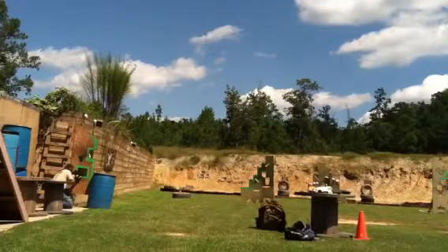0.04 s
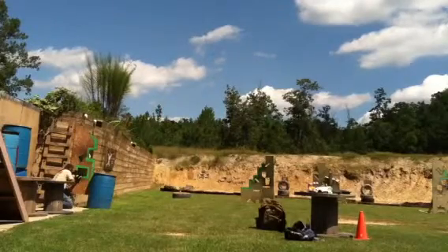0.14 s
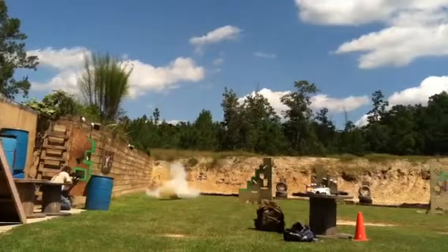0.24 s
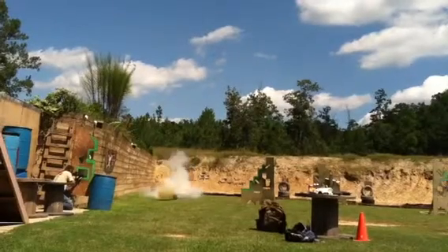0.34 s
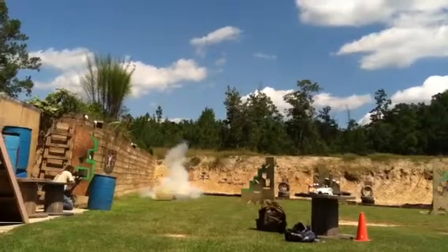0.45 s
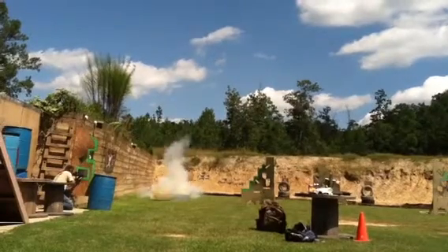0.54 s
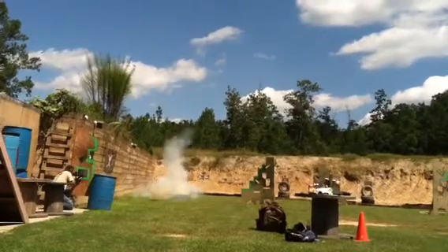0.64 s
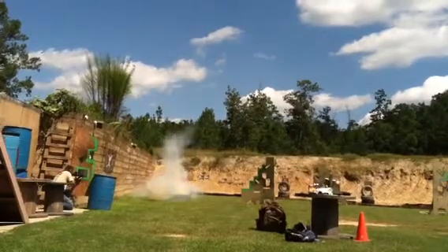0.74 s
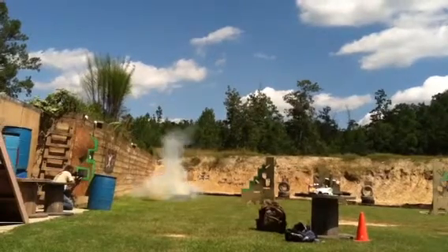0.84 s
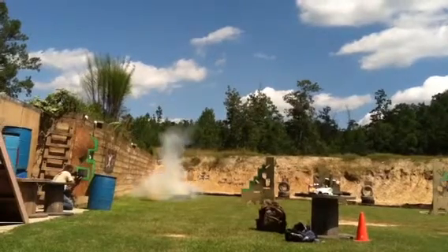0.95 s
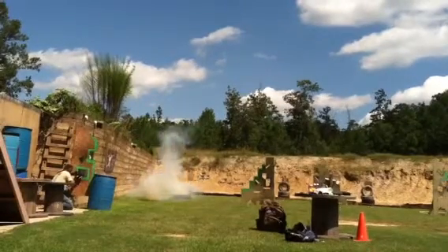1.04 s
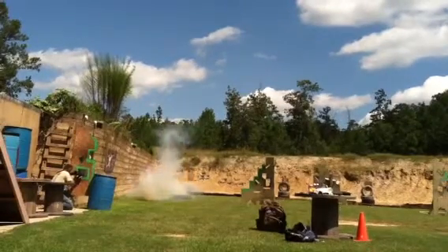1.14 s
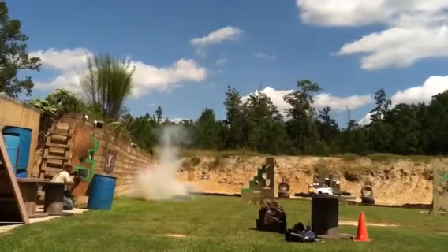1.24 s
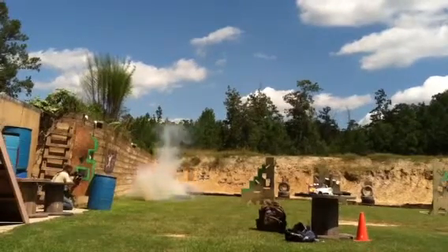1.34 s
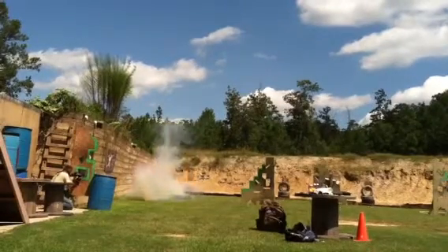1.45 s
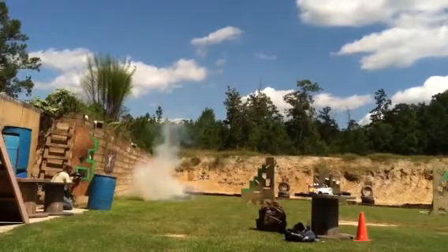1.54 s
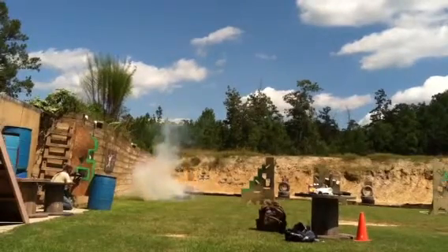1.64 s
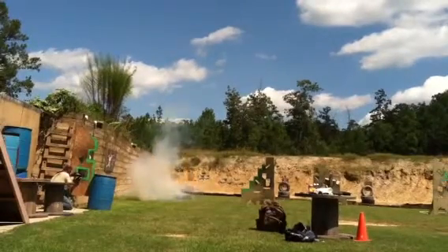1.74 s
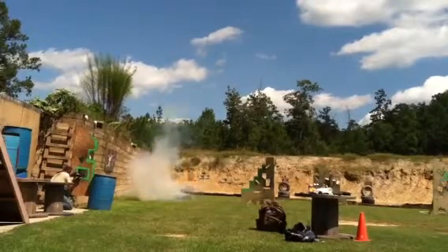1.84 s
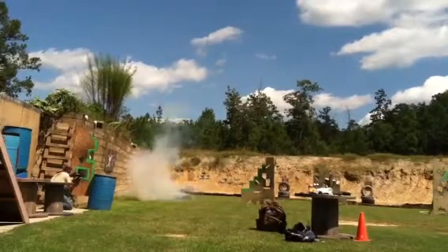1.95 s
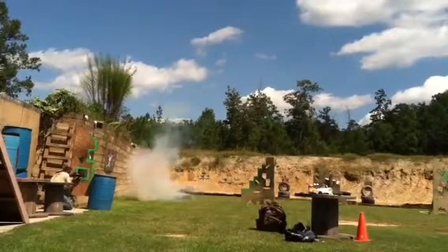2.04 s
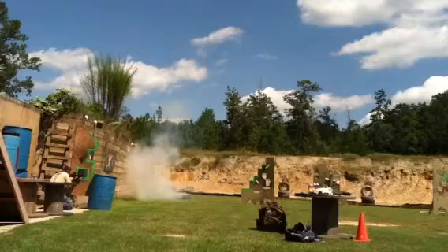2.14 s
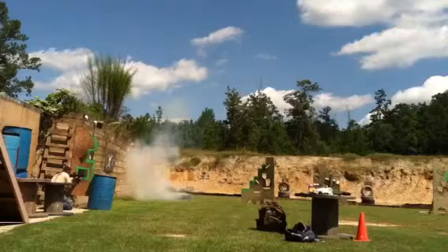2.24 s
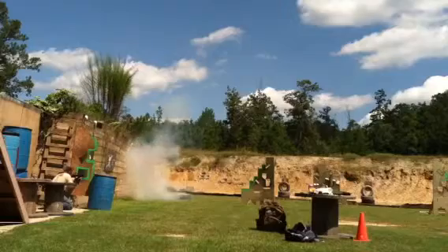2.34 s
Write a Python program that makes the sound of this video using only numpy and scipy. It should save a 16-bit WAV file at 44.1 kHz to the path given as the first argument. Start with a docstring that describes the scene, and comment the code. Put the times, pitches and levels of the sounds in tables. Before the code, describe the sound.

A loud explosive blast goes off an instant after the sharp rifle crack that triggers it. The boom rolls between earth banks and trees at an outdoor range, growing duller as it fades, and briefly overloads the small microphone.

```python
"""Rifle shot and small charge at an outdoor range

A shot sets off a charge: the crack comes first, then the blast, whose boom rolls between earth banks
and a tree line while the air absorbs the treble of its echoes. Faint ticks, a scuff, a rustle, hum
and hiss lie behind. The small microphone overloads."""
import sys
import numpy as np
from scipy import signal
from scipy.fft import rfft, irfft, next_fast_len
from scipy.io import wavfile
from scipy.ndimage import uniform_filter1d, map_coordinates

SR = 44100
rng = np.random.default_rng(int(sys.argv[2]) if len(sys.argv) > 2 else 0)


def transcribe(u):
    """Save the signal u as a 16-bit wav file named by the first command-line argument.

    u: samples, shape (n,) or (channels, n), limited to [-1, 1]; the rate is SR.
    q: integer samples, one column per channel.
    """
    v = np.clip(np.atleast_2d(u).T, -1, 1)
    q = np.round(v * 32767).astype(np.int16)
    wavfile.write(sys.argv[1], SR, q)


N = 105840
TIME = np.arange(N) / SR


def shock_fronts():
    """Shock waves: ragged cracks, and the blast's pressure step, which decays through zero into suction."""
    # Each row: start in seconds, level in dB, hold in seconds, 60 dB decay time in seconds.
    cracks = [(.219, -24, 0.0016, 0.0044), (.223, -2.5, 0.0032, .075), (0.2639, 2, 0.0032, .014)]
    # Each row: frequency in Hz, relative level in dB.
    colour = [(60, -5.5), (766, 2), (1440, -6), (3660, -8.5), (7000, -16.5), (10200, -23), (14500, -39.5),
              (16000, -50.5)]
    blast_s, overpressure_s = .2591, .0007
    age = np.clip(TIME - blast_s, 0, None) / overpressure_s
    blast = amp(3) * (age > 0) * (1 - age + .35 * noise(colour)) * np.exp(-age / 2)
    return blast + sum(amp(db) * burst(s, hold, t60) * noise(colour) for s, db, hold, t60 in cracks)


def boom():
    """Repeated reflection between the banks: low peals of unsteady pitch over a dark roll."""
    # Each row: start in seconds, length in seconds, level in dB, pitch in Hz.
    peals = [(0.267, 0.025, -3, 253), (0.292, 0.035, -11, 235), (0.319, .04, -4, 258),
             (0.358, 0.017, -16.5, 238.9), (0.373, 0.02, -8, 262.3), (0.396, 0.008, -8, 231),
             (0.42, 0.03, -13, 264.2), (0.47, 0.019, -10, 232.6), (0.501, 0.0435, -14, 284.5),
             (0.538, 0.013, -14, 230), (0.33, 0.052, -10, 150), (0.474, 0.073, -16.5, 145)]
    # Each row: time in seconds, level in dB.
    roll_levels = [(.262, -10), (.33, -7.5), (.4, -15), (.45, -21), (.52, -21), (.6, -22), (.7, -30.5),
                   (.9, -35), (1.25, -42.5), (1.75, -43), (1.9, -47.5), (2.4, -48)]
    # Each row: frequency in Hz, relative level in dB.
    roll_colour = [(60, -24), (100, -16.5), (145, -3), (250, 2.5), (320, -1.5), (400, -6), (520, -4.5),
                   (800, -21), (2000, -59)]
    wander, edge_s, low_cut_hz = .12, .0043, 125
    tones = 0
    for start, length, db, hz in peals:
        phase = 2 * np.pi * np.cumsum(hz * (1 + wander * wobble(100))) / SR
        swing = np.cos(phase) + amp(-12) * wobble(60) * np.cos(2 * phase)
        gate = np.clip(np.minimum(TIME - start, start + length - TIME) / edge_s + .5, 0, 1)
        tones += np.sqrt(2) * amp(db) * gate * swing
    tones = filtered(tones, lambda hz: 1 / (1 + (low_cut_hz / (hz + 1)) ** 6))
    return tones + envelope(roll_levels) * noise(roll_colour) * (TIME > roll_levels[0][0])


def diffuse_echo():
    """Scattering and air absorption: patchy returns, the duller the farther they have travelled."""
    # Each row: time in seconds, level in dB before absorption.
    levels = [(.262, -15), (.29, -19.5), (.37, -18), (.42, -23.5), (.47, -23.5), (.57, -23), (.62, -25.5),
              (.75, -28), (.9, -33.5), (1.1, -37.5), (1.3, -42), (1.8, -47.5), (2.4, -54)]
    # Each row: frequency in Hz, relative level in dB.
    colour = [(150, -22), (400, -4.5), (700, -2.5), (1100, 0), (2000, -3.5), (5000, -10.5), (8000, -19.5),
              (11000, -28), (14000, -53), (16000, -54.5)]
    # Each row: frequency in Hz, extra loss in dB per second of travel.
    absorption = [(1000, -0.5), (2000, 4.5), (3000, 12), (5000, 21), (8000, 44), (12000, 74), (16000, 91)]
    dulls_from_s = .54  # the near banks answer at full brightness until then
    hz, t, spectra = signal.stft(noise(colour), SR, nperseg=256)
    patches = uniform_filter1d(rng.standard_normal(spectra.shape), 4, axis=0)
    patches_db = 1.1 * unit(uniform_filter1d(patches, 8, axis=1))
    loss_db = along(absorption, hz)[:, None] * np.clip(t - dulls_from_s, 0, None)
    returns = signal.istft(spectra * amp(patches_db - loss_db), SR, nperseg=256)[1][:N]
    return envelope(levels) * amp(.27 * wobble(39.94)) * returns * (TIME > levels[0][0])


def slap_echoes():
    """Discrete reflection: far banks each send back a short slap."""
    # Each row: start in seconds, level in dB, pitch in Hz.
    slaps = [(.326, -16, 2180), (.374, -18, 3716), (.416, -18.5, 890), (.5, -38, 467), (.556, -12.5, 1150),
             (.574, -24.5, 1500), (.619, -25, 970), (.758, -19, 467), (.845, -32, 1140)]
    return puffs(slaps, t60=.061, width=.5)


def ticks_and_scuff():
    """Damped transients: faint ticks, then the friction of a close scuff in short scrapes."""
    # Each row of both: start in seconds, level in dB, pitch in Hz.
    ticks = [(1.23, -65, 8200), (1.49, -66, 6500), (1.511, -64.5, 8500), (1.513, -65, 5830),
             (1.54, -68, 6000), (2.047, -57, 9200)]
    scrapes = [(2.35, -49, 5810), (2.351, -64, 10230), (2.354, -45, 3165), (2.36, -57, 5900),
               (2.365, -45, 4600), (2.366, -58.5, 10500), (2.38, -50, 4300), (2.381, -59, 10600),
               (2.388, -57, 5740)]
    return puffs(ticks, t60=.0039, width=.44) + puffs(scrapes, t60=.041, width=.57)


def background():
    """Ambient noise floor: steady air, mains hum, a passing rustle and a high hiss that grows late."""
    # Each row: frequency in Hz, rms level in dB.
    hum_tones = [(120, -66), (360, -65), (480, -76), (1367, -82)]
    # Each row of both: time in seconds, level in dB.
    rustle_levels = [(1.7, -83), (1.88, -70), (1.96, -60), (2.07, -67.5), (2.15, -73.5), (2.4, -78.5)]
    hiss_levels = [(.9, -94.5), (1.5, -79), (2.0, -72.5), (2.4, -74.5)]
    # Each row of all three: frequency in Hz, relative level in dB.
    air_colour = [(60, -34), (110, -1.5), (200, 3.5), (350, -1.5), (600, -13.5), (1400, -13.5),
                  (3000, -20.5), (7000, -24.5), (10000, -37), (15500, -43)]
    rustle_colour = [(1500, -20), (2800, -2), (3600, 0), (5000, -6), (8000, -16), (14000, -32)]
    hiss_colour = [(4000, -20), (5800, -4), (7000, 0), (8000, -8), (11000, -16), (15000, -26)]
    hum = 0
    for hz, db in hum_tones:
        peak = np.sqrt(2) * amp(db + .71 * wobble(8.7))
        hum += peak * np.sin(2 * np.pi * hz * TIME + rng.uniform(0, 2 * np.pi))
    rustle = envelope(rustle_levels) * amp(1.5 * wobble(30)) * noise(rustle_colour)
    air = amp(-59) * noise(air_colour)
    hiss = envelope(hiss_levels) * noise(hiss_colour)
    return air + hum + rustle + hiss


def amp(db):
    """Decibels as an amplitude ratio."""
    return 10 ** (np.asarray(db) / 20)


def unit(x):
    """Normalisation to rms 1."""
    return x / np.sqrt(np.mean(x ** 2) + 1e-20)


def along(points, hz):
    """Interpolation on a logarithmic frequency axis."""
    knots_hz, values = np.transpose(points)
    return np.interp(np.log(hz + 1), np.log(knots_hz + 1), values)


def envelope(levels):
    """Gain per sample, interpolated in decibels."""
    return amp(np.interp(TIME, *np.transpose(levels)))


def wobble(rate):
    """Smooth random modulation, rate knots a second."""
    return map_coordinates(rng.standard_normal(2000), [TIME * rate])


def filtered(x, response):
    """Linear filtering: the spectrum times a frequency response."""
    size = next_fast_len(N + SR // 2)
    return irfft(rfft(x, size) * response(np.fft.rfftfreq(size, 1 / SR)), size)[:N]


def noise(colour):
    """Spectrally shaped noise of rms 1."""
    return unit(filtered(rng.standard_normal(N), lambda hz: amp(along(colour, hz))))


def burst(start_s, hold_s, t60):
    """Sudden onset, hold, then exponential decay of 60 dB in t60 seconds."""
    age = TIME - start_s
    return (age >= 0) * amp(-60 * np.clip(age - hold_s, 0, None) / t60)


def puffs(rows, t60, width):
    """Resonance: soft-edged noise bursts, each band-passed twice with Q = 1 / width."""
    total = 0
    for start, db, hz in rows:
        resonance = lambda f: (1j * f * width * hz / (hz * hz - f * f + 1j * f * width * hz)) ** 2
        band = unit(filtered(rng.standard_normal(N), resonance))
        total += amp(db) * uniform_filter1d(burst(start, 0, t60), size=60) * band
    return total


def scene():
    """Superposition of all sources at one microphone."""
    transients = slap_echoes() + ticks_and_scuff()
    return (shock_fronts() + boom() + diffuse_echo() + transients + background())[None]


def record(dry):
    """Saturation: the microphone drops the deep bass, its input overloads, and the band is limited."""
    low_cut_hz, ceiling, top_hz, taper_hz = 85, .73, 16050, 800
    pressure = filtered(dry[0], lambda hz: (1j * hz / (low_cut_hz + 1j * hz)) ** 3)
    clipped = pressure / (1 + (pressure / ceiling) ** 4) ** (1 / 4)
    band_limit = lambda hz: np.sin(np.pi / 2 * np.clip((top_hz - hz) / taper_hz, 0, 1)) ** 2
    return filtered(clipped, band_limit)[None]


dry = scene()
out = record(dry)
transcribe(out)
```